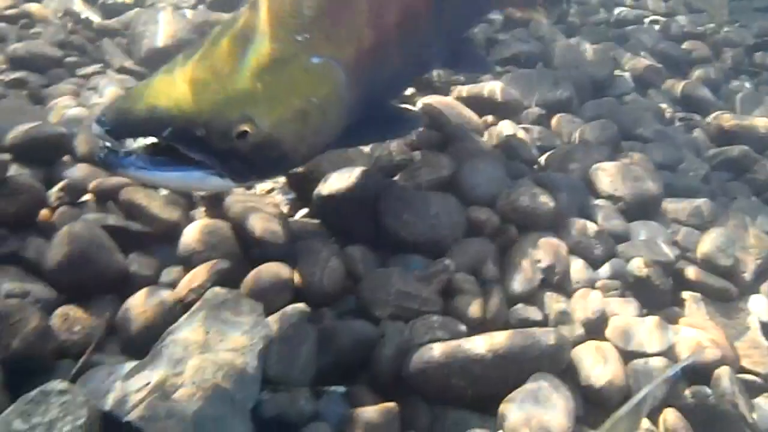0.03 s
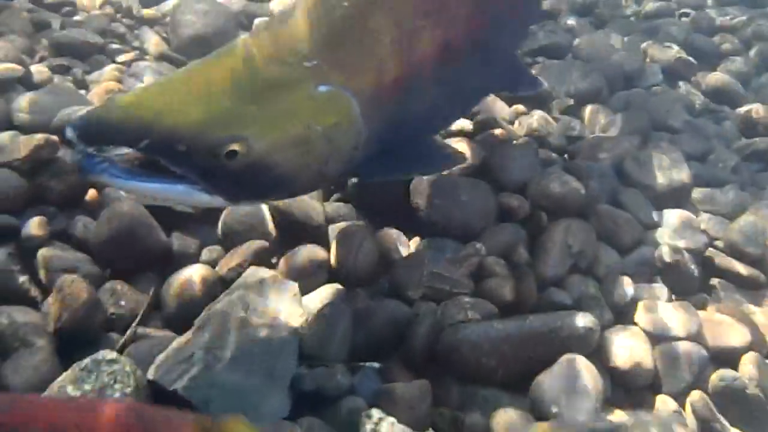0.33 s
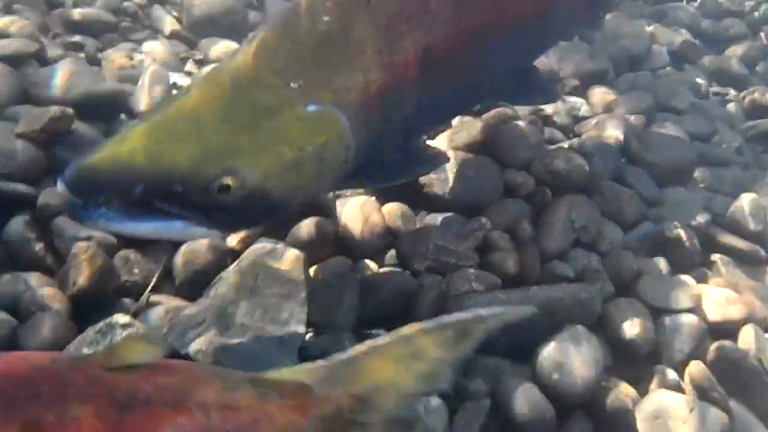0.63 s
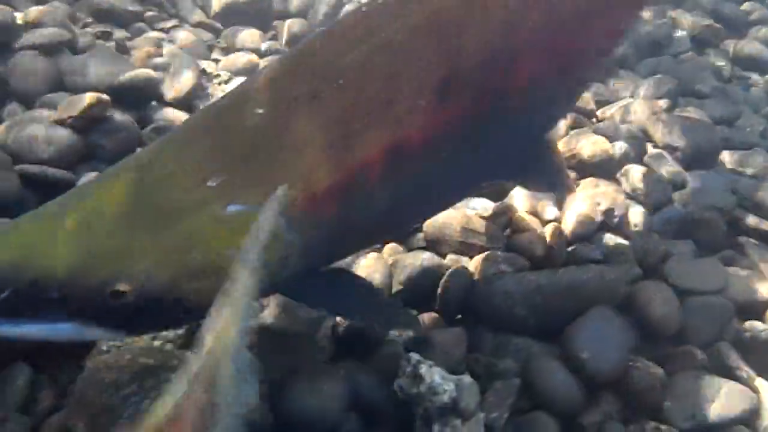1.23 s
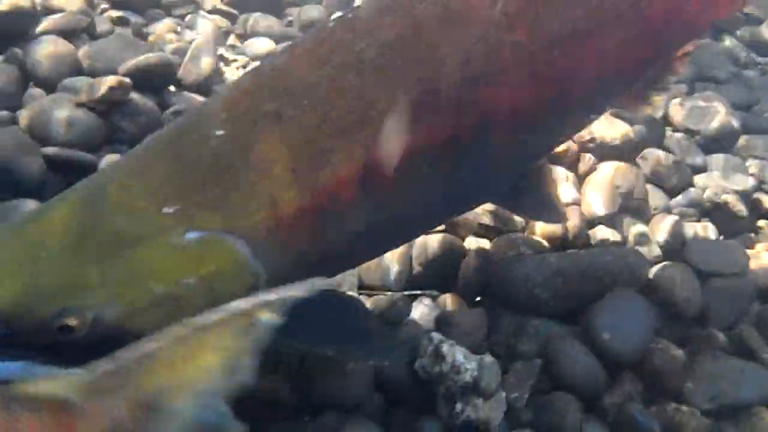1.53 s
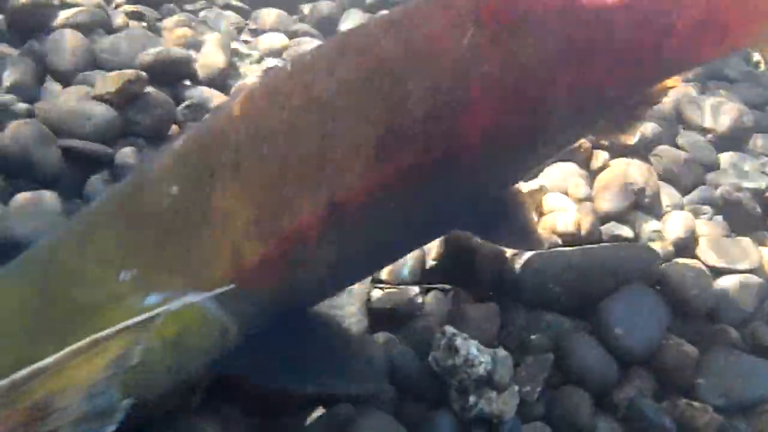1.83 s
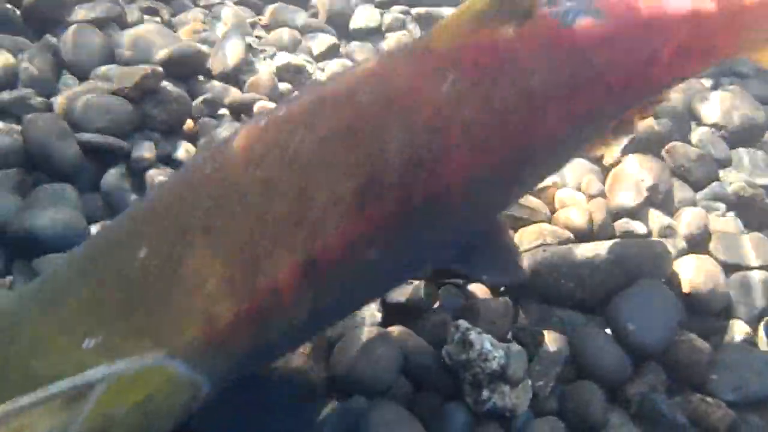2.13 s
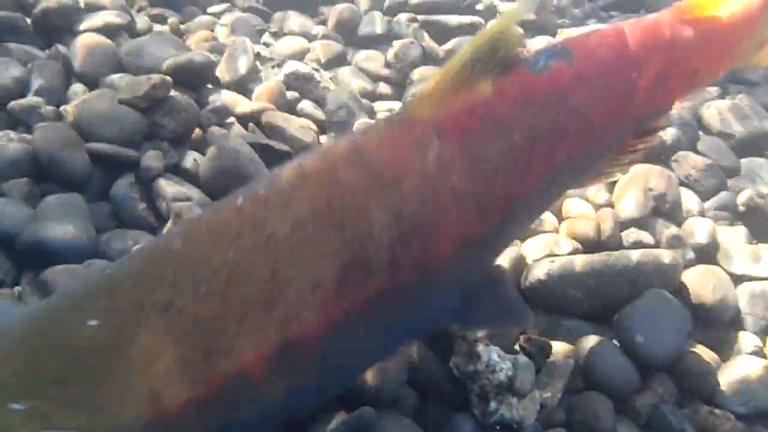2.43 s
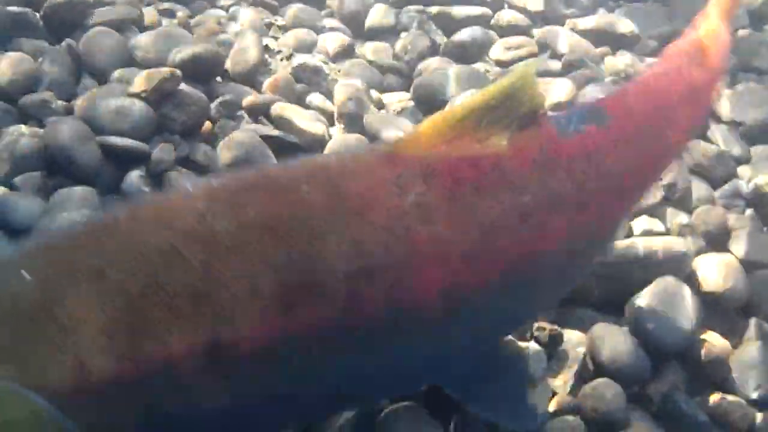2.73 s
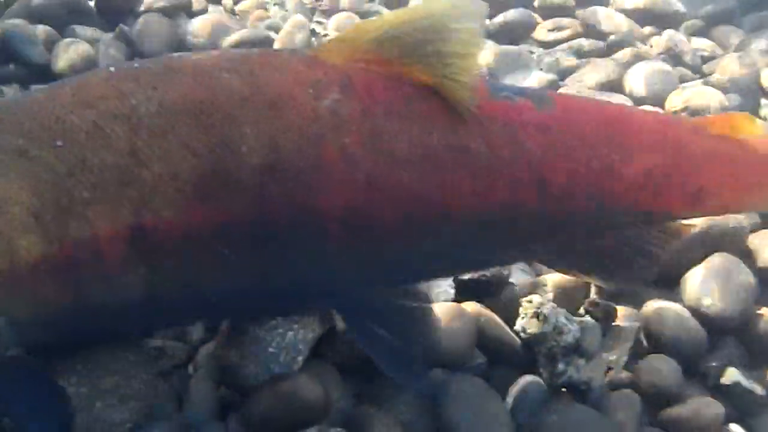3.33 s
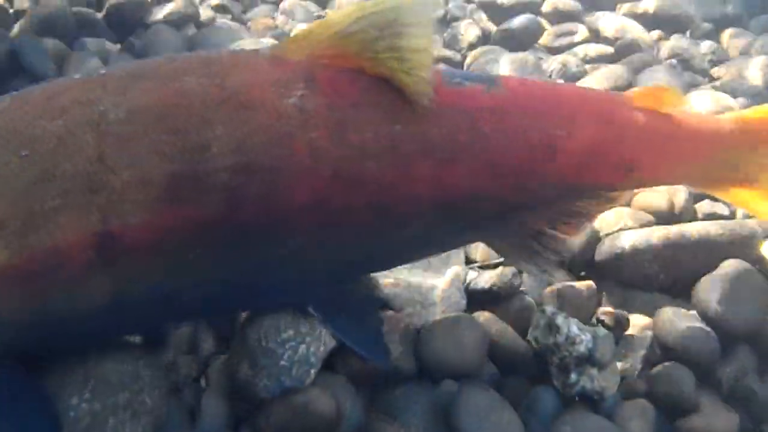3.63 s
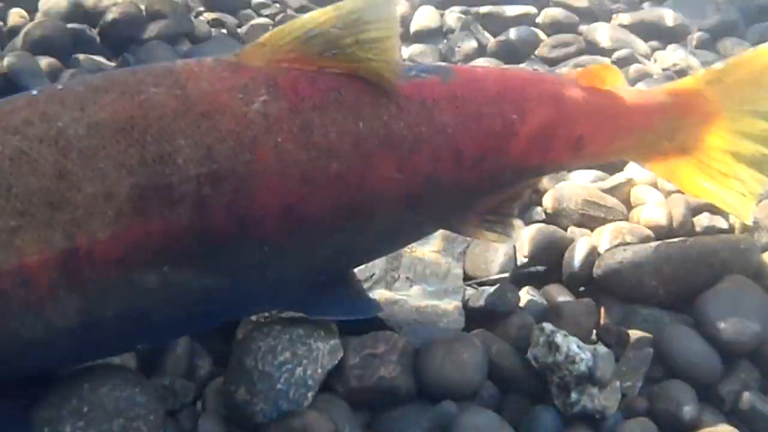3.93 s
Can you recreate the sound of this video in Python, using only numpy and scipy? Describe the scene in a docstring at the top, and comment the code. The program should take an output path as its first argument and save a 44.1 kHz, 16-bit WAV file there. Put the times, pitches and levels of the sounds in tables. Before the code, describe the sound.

Flowing water rumbles low against a submerged camera, nudging and knocking its case. Midway, a passing salmon stirs the stream bed into brief gravel crackles, and a hard knock comes near the end. The camera faintly rasps and whines throughout.

```python
"""A deep rumble and small knocks come first: a stream presses on a waterproof camera case in the gravel.
Eddies make the rumble; dull nudges rock the case, and knocks ring its modes.
Pebbles crackle and clack as a passing salmon stirs the shallow bed.
Near the end one hard bump drives a limiter, which ducks the gain.
The camera's own pulsing rasp, hiss and thin whine run underneath."""
import sys
import numpy as np
from scipy import signal
from scipy.fft import rfft, irfft
from scipy.io import wavfile
from scipy.ndimage import uniform_filter1d

SR = 44100
rng = np.random.default_rng(int(sys.argv[2]) if len(sys.argv) > 2 else 0)


def unload_wav(signal):
    """Save mono or channel-first audio to the path in sys.argv[1] as 16-bit WAV at rate SR, clipped to [-1, 1]."""
    wavfile.write(
        sys.argv[1],
        SR,
        np.round(np.clip(np.atleast_2d(signal).T, -1, 1) * 32767).astype(np.int16),
    )


N = 176400
MODE_SPREAD_DB = 1.5  # each impact excites the modes a little differently


def amp(db):
    """Decibels to amplitude ratio."""
    return 10 ** (np.asarray(db) / 20)


def unit(x):
    """Normalisation to rms 1."""
    return x / np.sqrt(np.mean(x ** 2) + 1e-20)


def curve(rows, column):
    """Linear interpolation of one column of a time table, at every sample."""
    rows = np.array(rows)
    return np.interp(np.arange(N) / SR, rows[:, 0], rows[:, column])


def add(mix, start_s, sound):
    """Superposition: a sound joins the mix at its start time."""
    part = mix[max(round(start_s * SR), 0):][:len(sound)]
    part += sound[:len(part)]


def noise(spectrum):
    """Spectral shaping of white noise; rms 1."""
    hz, db = np.transpose(spectrum)
    f = np.fft.rfftfreq(N, 1 / SR)
    gain = amp(np.interp(np.log(f + 1), np.log(hz), db))
    return unit(irfft(rfft(rng.standard_normal(N)) * gain, N))


def steadied(x, samples):
    """Division by the running rms takes the slow swells out of a noise."""
    return x / np.sqrt(uniform_filter1d(x ** 2, samples) + 1e-9)


def dispersed(x, cycles, low_hz):
    """Dispersion of bending waves in the case wall: lows arrive after highs, and the lowest are lost."""
    f = np.fft.rfftfreq(2 * len(x), 1 / SR)
    x = signal.sosfilt(signal.butter(5, low_hz, "high", fs=SR, output="sos"), x)
    lag = np.exp(-2j * np.pi * cycles * np.log(1 + f / low_hz))
    return irfft(rfft(x, 2 * len(x)) * lag)[:len(x)]


def camera(rasp_hz=29.97, uneven_db=2.5, whine_hz=8151.5, spacing_hz=60.6):
    """Amplitude modulation makes the mechanism's rasp; the electronics' tones beat over a steady hiss."""
    # one cycle of the mechanism (phase [cycles], relative level [dB])
    rasp_cycle = [(0, -15), (.07, -6.5), (.14, 4), (.26, 8), (.33, 4.5), (.42, 3), (.46, 5.5), (.52, 10.5),
                  (.6, 6), (.7, 4.5), (.82, -19.5), (1, -10)]
    # spectra of rasp and hiss (frequency [Hz], relative density [dB])
    rasp_spectrum = [(300, -11), (600, -10), (830, 6.5), (1100, -16.5), (1800, -14.5), (2150, -6.5),
                     (2480, 2.5), (3000, -5), (3550, -10.5), (4000, -5.5), (4400, -11), (4900, -7.5),
                     (6200, -25.5), (7500, -24.5), (14000, -36)]
    hiss_spectrum = [(100, 8), (350, 16), (520, 13), (680, 9.5), (830, 14.5), (1100, 11), (1800, 6),
                     (2500, 10.5), (3300, 4.5), (5000, 0), (7000, -0.5), (10000, -0.5), (14000, -1)]
    # evenly spaced lines of the whine (offset from whine_hz [spacings], relative level [dB])
    whine_lines = [(-2, -73), (-1, -68.5), (0, -58.5), (1, -59.5), (2, -68.5), (3, -73.5), (4, -75.5)]
    t = np.arange(N) / SR
    uneven = unit(uniform_filter1d(rng.standard_normal(N), size=400))
    cycle_db = np.interp(t * rasp_hz % 1, *np.transpose(rasp_cycle))
    rasp = noise(rasp_spectrum) * unit(amp(cycle_db + uneven_db * uneven))
    whine = sum(amp(db) * np.cos(2 * np.pi * (whine_hz + k * spacing_hz) * t + np.pi * (k > 0))
                for k, db in whine_lines)
    return amp(-50) * rasp + amp(-51.5) * noise(hiss_spectrum) + amp(-2) * np.sqrt(2) * whine


def current():
    """Turbulent pressure: eddies load the case with a deep rumble and a lighter flutter."""
    # strength of the flow (time [s], relative rumble level [dB], relative flutter level [dB])
    flow = [(0, -11, -42), (.15, -21.5, -38), (.4, -22, -39.5), (.66, -20.5, -45.5), (.8, -24.5, -53),
            (1.15, -27, -50), (1.44, -20.5, -43), (1.56, -24.5, -42), (1.66, -25, -43.5), (1.9, -27, -49.5),
            (2.24, -29, -47.5), (2.45, -30.5, -57.5), (2.65, -23, -47), (3.1, -27, -37), (3.4, -20.5, -43),
            (3.68, -25.5, -37.5), (3.78, -24.5, -52), (4, -30.5, -44.5)]
    # spectra of the eddy pressure (frequency [Hz], relative density [dB])
    rumble_spectrum = [(8, -7.5), (18, 4.5), (32, 0), (58, -5), (85, -12.5), (115, -37), (200, -53),
                       (400, -65.5)]
    flutter_spectrum = [(40, -52), (85, 4.5), (120, -1), (155, 1.5), (200, -15), (280, -15), (400, -26.5),
                        (700, -23), (1500, -53)]
    rumble = steadied(noise(rumble_spectrum), samples=7000) * amp(curve(flow, column=1) - 0.5)
    flutter = steadied(noise(flutter_spectrum), samples=5000) * amp(curve(flow, column=2) + 1)
    return rumble + flutter


def nudges(rise_s=0.0074, t60_s=0.054):
    """Damped oscillation: each soft push of the water rocks the case for a few cycles."""
    # pushes of the water (time [s], peak level [dB], frequency [Hz])
    pushes = [(.05, -15.5, 124), (.118, -18.5, 78.5), (0.161, -17.5, 87), (0.686, -20, 100),
              (1.425, -19.5, 78), (1.608, -14.5, 101), (2.777, -17.5, 58), (3.617, -13.5, 78)]
    out, t = np.zeros(N), np.arange(SR // 4) / SR
    envelope = (1 - np.exp(-(t / rise_s) ** 2)) * amp(-60 * t / t60_s)
    for start_s, level, hz in pushes:
        rocking = np.sin(2 * np.pi * hz * t) * envelope
        add(out, start_s, amp(level) * rocking / abs(rocking).max())
    return out


def pebble(tilt_db, tilt_top_hz=5900, scatter=0.012, chatter=0.19, chatter_s=0.0015):
    """Impact excitation: stone chatters on stone and rings the high modes of the case; peak 1."""
    # high modes of the case (frequency [Hz], relative level [dB], T60 [s])
    high_modes = [(2567, 2.5, .022), (2780, -2.5, 0.016), (3140, -9, 0.0095), (3260, -9, 0.017),
                  (3500, 0.5, 0.016), (3634, -1.5, 0.011), (3980, -6, 0.011), (4400, -10.5, 0.013),
                  (4975, -2, 0.0095), (5500, -2, 0.012), (5930, -4, 0.0093), (6210, -3, 0.0063),
                  (7350, -13.5, 0.0057), (8550, -18, 0.0056), (11100, -21, .0015)]
    t = np.arange(SR // 30) / SR
    hz, db, t60 = np.array(high_modes).T[:, :, None]
    strength, detune, phase = rng.standard_normal((3, len(high_modes), 1))
    octaves = np.log2(np.minimum(hz, tilt_top_hz) / hz[0])
    envelopes = amp(db + MODE_SPREAD_DB * strength + tilt_db * octaves - 60 * t / t60)
    ring = (envelopes * np.sin(2 * np.pi * (hz * (1 + scatter * detune) * t + phase))).sum(0)
    contacts = (t == 0) + chatter * rng.standard_normal(len(t)) * np.exp(-t / chatter_s)
    click = dispersed(signal.fftconvolve(contacts, ring)[:len(t)], cycles=4, low_hz=2350)
    return click / abs(click).max()


def grains(per_s, tilt_db, stones=24, spread_db=5.5):
    """Shot noise: small stone contacts arrive at random times and strengths; rms 1."""
    hits = (rng.random(N) < per_s / SR) * amp(spread_db * np.minimum(rng.exponential(1, N), 3.5))
    stone = rng.integers(0, stones, N)
    return unit(sum(signal.oaconvolve(hits * (stone == k), pebble(tilt_db))[:N] for k in range(stones)))


def gravel():
    """Granular collisions: gravel and grit scrape as the fish stirs the bed; some pebbles clack loudly."""
    # shifting of the bed (time [s], gravel level [dB], grit level [dB])
    stirring = [(0, -54.5, -84), (1.38, -61, -70), (1.44, -54, -51), (1.53, -71, -58), (1.62, -57, -55),
                (1.72, -61, -53), (1.81, -41, -42.5), (1.87, -59, -52.5), (1.94, -35.5, -44.5),
                (2.04, -59, -48), (2.16, -41, -48.5), (2.3, -54, -48), (2.38, -59, -52), (2.45, -42.5, -51),
                (2.52, -56.5, -58), (2.72, -70, -59), (2.88, -47, -63), (3.1, -76, -63), (4, -63, -67)]
    # single pebble impacts (time [s], relative level [dB], spectral tilt [dB/octave])
    clacks = [(0.498, -30, -35), (1.609, -26.5, 10), (1.649, -39, -7), (1.667, -31.5, 3), (1.723, -23, 4),
              (1.756, -28.5, 2), (1.774, -26.5, 11), (1.804, -24.5, 12), (1.899, -28.5, 6), (1.921, -21, 0),
              (1.926, -13.5, -4), (1.931, -28, 6), (1.97, -26.5, 3), (2.161, -24, 6), (2.172, -19, -4),
              (2.186, -23, 13), (2.22, -26, 4), (2.2272, -9.5, -7.5), (2.254, -28, 4), (2.267, -27, 8),
              (2.281, -24.5, 2), (2.308, -16.5, -5), (2.327, -24, -6), (2.349, -30.5, 18),
              (2.378, -29.5, 10), (2.397, -29.5, -4), (2.456, -26, 1.5), (2.648, -22.5, -5),
              (2.799, -25.5, 9)]
    out = grains(per_s=1000, tilt_db=0) * amp(curve(stirring, column=1))
    out += grains(per_s=1100, tilt_db=18) * amp(curve(stirring, column=2))
    for start_s, level, tilt_db in clacks:
        add(out, start_s, amp(level - 1.5) * pebble(tilt_db))
    return out


def knocks(scatter=0.012, soft_top_hz=996, firm_db=-25.5, octaves_per_db=0.04, rebound=0.9):
    """Modal resonance: a push and its opposite rebound, milliseconds later, both ring the case."""
    # knocks (time [s], relative level [dB], spectral tilt [dB/octave], rebound delay [s])
    impacts = [(.052, -19.5, 9, 0.0039), (.072, -18.5, 13, .004), (.2, -23, 4, .004),
               (.226, -21, 14, 0.003), (.254, -29, 7, 0.0049), (.31, -35, 7, 0.0041),
               (0.35, -29.5, 11, 0.0043), (.376, -36, 22, 0.0039), (.538, -21, 2.5, 0.0037),
               (.559, -23, 5, 0.0043), (1.16, -19, 3, 0.0038), (1.257, -23.5, 7, 0.0042),
               (1.322, -28.5, 1, 0.0038), (1.529, -33, -2, 0.0038), (1.55, -34.5, 1, 0.0036),
               (1.776, -20.5, 1, 0.0038), (1.795, -20, 3, 0.0042), (2.629, -21, 3, 0.0038),
               (2.856, -24.5, 10.5, .004), (2.913, -23, 8, 0.0039), (3.002, -35.5, 7, 0.0035),
               (3.02, -31.5, -3.5, .004), (3.076, -31.5, -5, 0.0041), (3.192, -24, 4, 0.0042),
               (3.268, -30.5, -2, 0.0042), (3.5245, -1, -5.5, 0.00263), (3.613, -27.5, -7, 0.0037),
               (3.623, -27.5, -8.5, .004)]
    # low modes of the case (frequency [Hz], relative level [dB], T60 [s])
    low_modes = [(160.4, -2.5, 0.098), (194, -23, 0.039), (250, -5.5, 0.068), (400.4, -3.5, 0.091),
                 (456, -0.5, 0.046), (531, 4.5, 0.031), (678, -6, .022), (768, -6, 0.052),
                 (933, -13, 0.021), (1240, -19, 0.048), (1550, -20, .014)]
    out, t = np.zeros(N), np.arange(SR // 4) / SR
    hz, db, t60 = np.array(low_modes).T[:, :, None]
    for start_s, level, tilt_db, rebound_s in impacts:
        strength, detune = rng.uniform(-1, 1, (2, len(low_modes), 1))
        envelopes = amp(db + tilt_db * np.log2(hz / 500) + MODE_SPREAD_DB * strength - 60 * t / t60)
        ring = (envelopes * np.sin(2 * np.pi * hz * (1 + scatter * detune) * t)).sum(0)
        # a knock harder than firm_db has a shorter contact and reaches higher
        top_hz = soft_top_hz * 2 ** (octaves_per_db * max(level - firm_db, 0))
        contact = signal.butter(4, top_hz, fs=SR, output="sos")
        ring = dispersed(signal.sosfilt(contact, ring), cycles=0.788, low_hz=100)
        ring *= amp(level - 1.5) / abs(signal.hilbert(ring)).max()
        add(out, start_s, ring)
        add(out, start_s + rebound_s, -rebound * ring)
    return out


def scene():
    """Superposition: all sources sum at one microphone inside the case."""
    return (current() + knocks() + nudges() + gravel() + camera())[None]


def record(dry, limit_db=-10.5, attack_s=0.0014, recovery_db_per_s=71, cutoff_hz=14350):
    """Peak limiting: the gain ducks quickly and recovers slowly; a low-pass then limits the band."""
    over_db = np.maximum(20 * np.log10(abs(dry[0]) + 1e-9) - limit_db, 0)
    recovery_db = np.arange(N) * recovery_db_per_s / SR
    held_db = np.maximum.accumulate(over_db + recovery_db) - recovery_db
    pole = np.exp(-1 / (attack_s * SR))
    duck_db = signal.lfilter([1 - pole], [1, -pole], held_db)
    low_pass = signal.firwin(511, cutoff_hz, window=("kaiser", 9), fs=SR)
    return signal.oaconvolve(dry * amp(-duck_db), low_pass[None], "same")


dry = scene()
out = record(dry)
unload_wav(out)
```